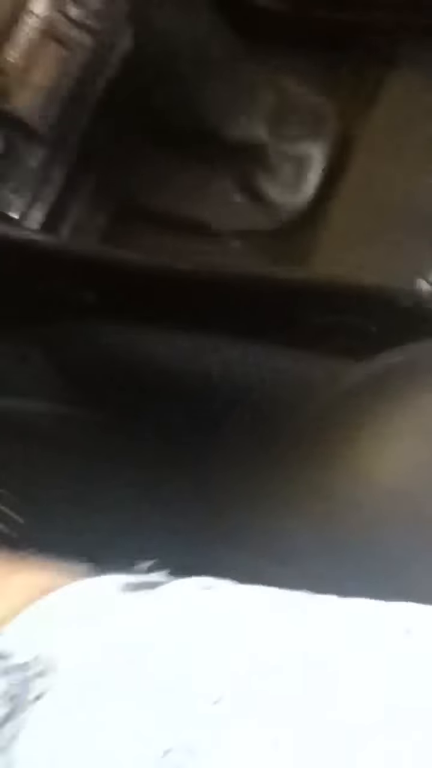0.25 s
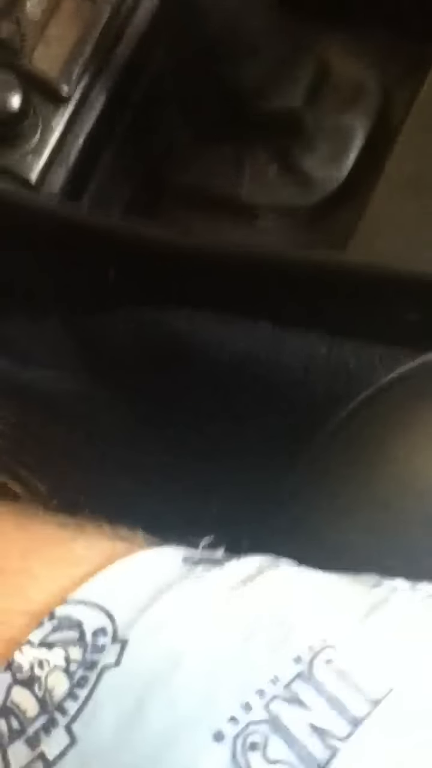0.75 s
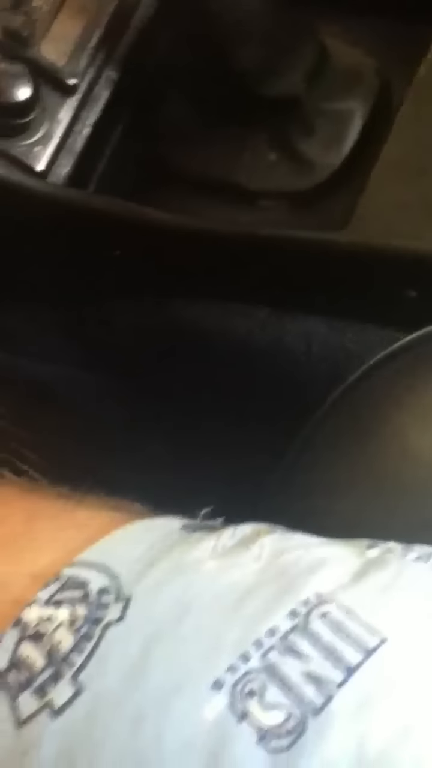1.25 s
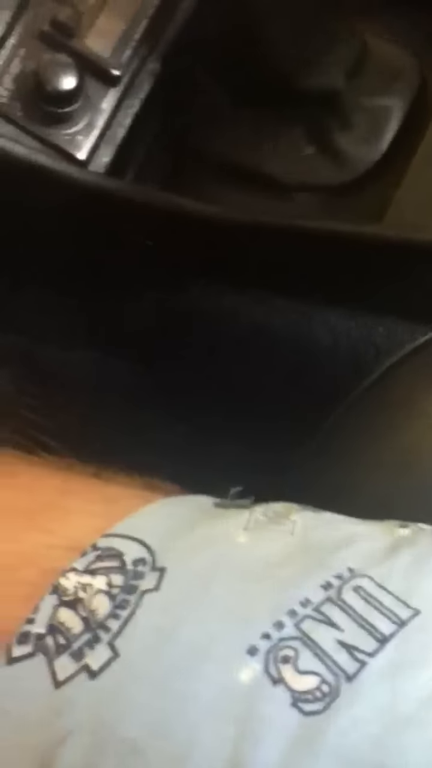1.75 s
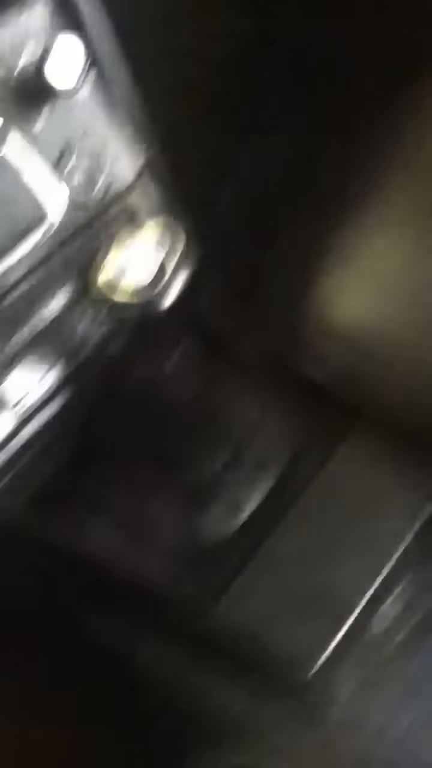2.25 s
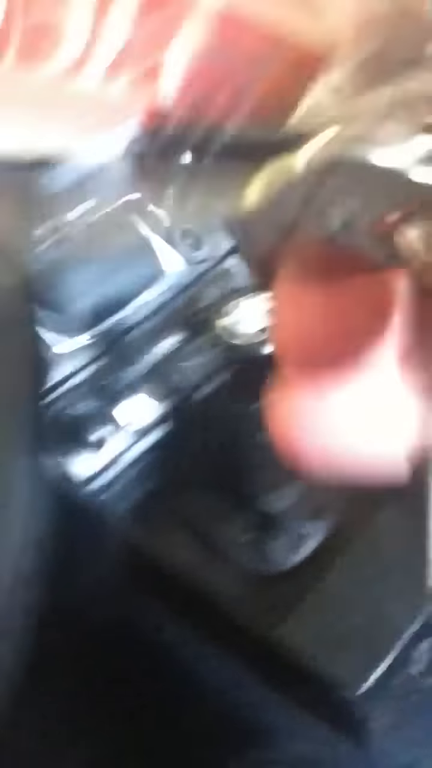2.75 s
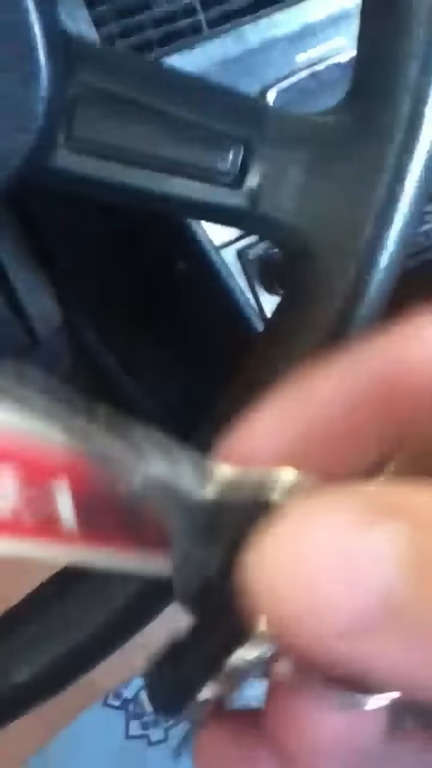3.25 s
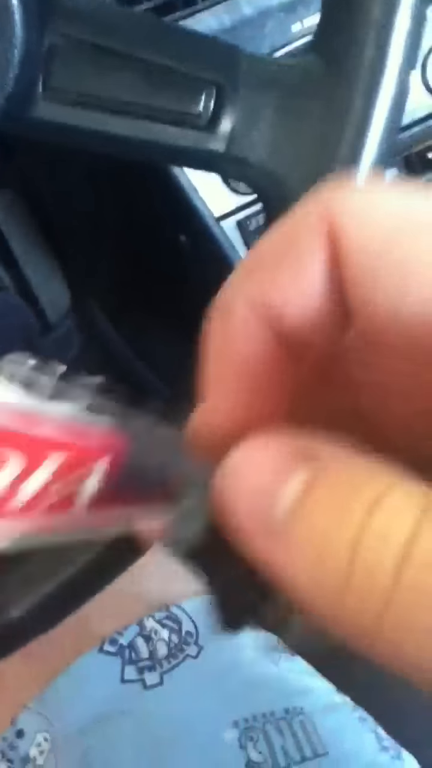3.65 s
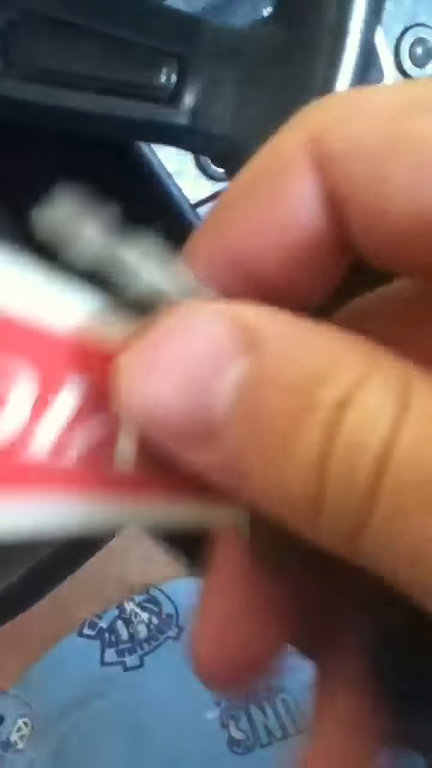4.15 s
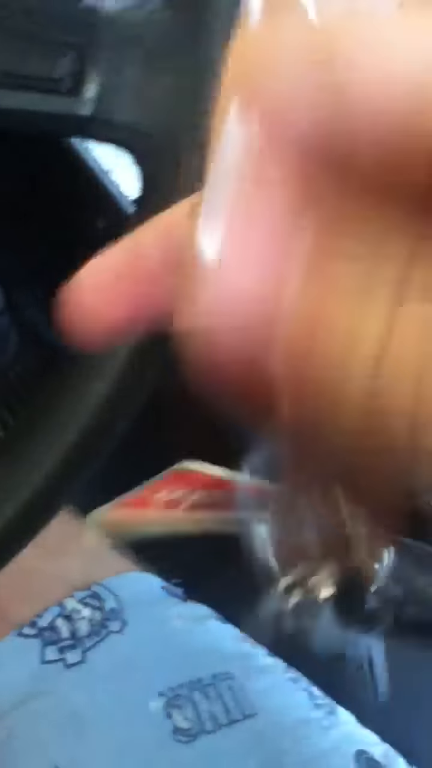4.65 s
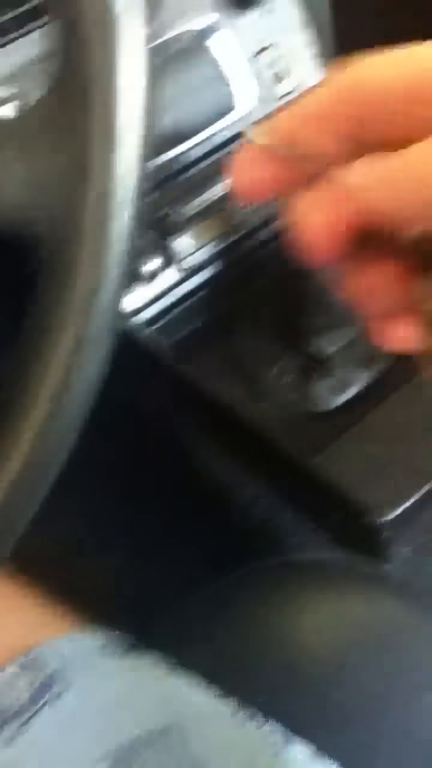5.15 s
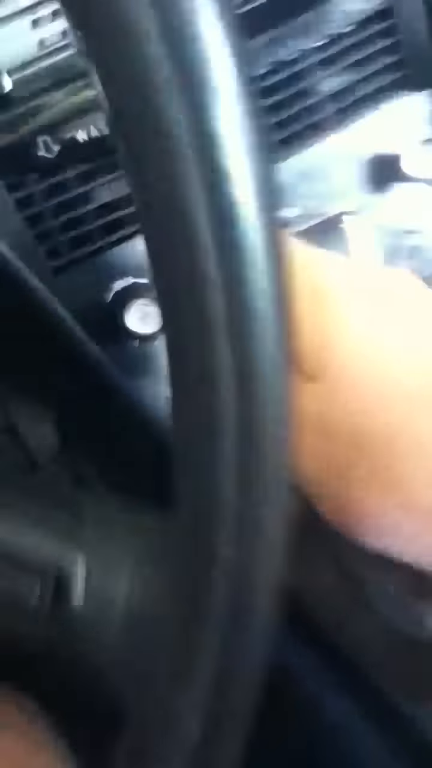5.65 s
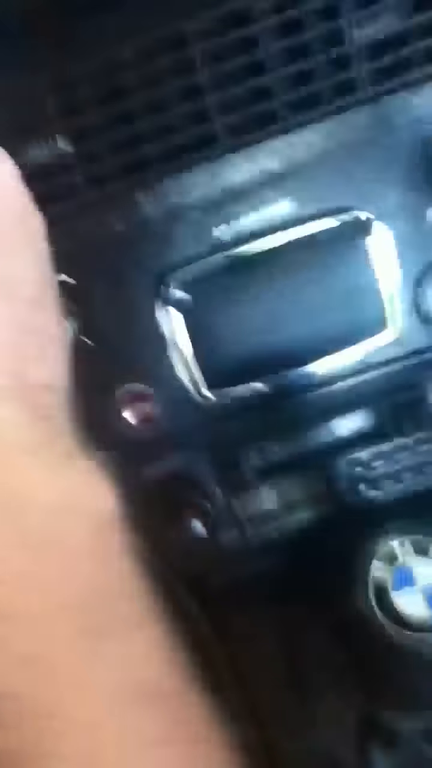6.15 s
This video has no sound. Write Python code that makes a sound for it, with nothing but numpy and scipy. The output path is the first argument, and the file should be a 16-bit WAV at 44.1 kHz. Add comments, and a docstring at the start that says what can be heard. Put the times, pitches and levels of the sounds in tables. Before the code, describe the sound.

Keys on a ring jingle in the hand inside a parked car, heard close up. High, glassy clinks come fast for two seconds, become drier and more clicky as fingers sort them, swell again twice, then almost stop. Plastic tags tap among them, seat cloth rustles softly, and one hollow plastic clack ends it over faint hum and hiss.

```python
"""Keys in a parked car

A bunch of keys is picked up, shaken and sorted in the hand, close to a phone. Keys are noise cracks plus
ringing tones that the fingers damp; small parts chatter as noise and tiny ringing ticks between the clinks.
Plastic tags knock and a trim panel clacks, as fading tones with noisy thuds. Cloth and seat rustle as
filtered noise over the cabin's quiet hum, hiss and faint whine; a short echo follows keys and knocks."""
import sys
import numpy as np
from scipy import signal
from scipy.fft import rfft, irfft, next_fast_len
from scipy.io import wavfile
from scipy.ndimage import uniform_filter1d

SR = 44100
rng = np.random.default_rng(int(sys.argv[2]) if len(sys.argv) > 2 else 0)


def inscribe(sig):
    """Save sig as 16-bit PCM at rate SR to the path in sys.argv[1].

    A 1-D sig is mono; a 2-D sig holds one channel per row.
    Samples are clipped to [-1, 1] before scaling.
    """
    pcm = np.round(np.clip(np.atleast_2d(sig).T, -1, 1) * 32767)
    wavfile.write(sys.argv[1], SR, pcm.astype(np.int16))


N = 282356

# Clear clinks of key on key. Each row: start in seconds, strength in dB,
# pitch in Hz near which modes sound loudest, dull crack relative to the strength in dB.
CLINKS = [(0.3358, -30.5, 4040, 5.5), (.47, -18, 10100, -9), (0.4744, -14, 9670, -10.5),
          (.4775, -13.5, 9700, -10), (0.5226, -5, 10820, -27), (.53, -6.5, 11100, -17),
          (0.5515, -11.5, 9800, -11.5), (0.6062, -15, 12800, -17), (.6157, 1, 12800, -42),
          (0.6244, -8, 12750, -19), (.7666, -21, 13300, -4), (0.7996, -25, 7470, -1),
          (.8389, -25, 7270, -2), (0.9042, -16, 13300, -20), (0.9197, -6.5, 13740, -34),
          (.9385, -9.5, 9700, -29), (0.9443, -19, 10900, -36), (0.962, -25, 7260, -28),
          (.9813, 0.5, 13780, -25), (1.039, -34, 4960, -3), (1.0988, -13, 12300, -43),
          (1.1193, -7, 14100, -31), (1.122, -11, 13820, -45), (1.199, -30, 13100, -31),
          (1.296, -30, 7950, -9), (1.3196, -18, 11100, -30), (1.3542, -15, 9700, -35),
          (1.4245, -24, 8200, -24), (1.595, -25.5, 6700, -1.5), (1.641, -32, 8340, -20),
          (1.654, -25, 8410, -30), (1.6711, -7.5, 8400, -23), (1.675, -8, 7470, -17),
          (1.6988, -15, 12820, -13), (1.733, -17, 12800, -19), (1.7393, -9, 12830, -32),
          (1.756, -15, 12860, -24), (1.772, -14, 12810, -19), (1.7758, -18, 7280, -15),
          (1.806, -8, 13000, -24), (1.84, -26, 12900, -33), (1.909, -18, 8350, -27),
          (1.991, -20, 8340, -20), (2.0406, -25, 10400, -11.5), (2.191, -35.5, 5100, 2),
          (2.208, -22, 8290, -32), (2.2838, -9, 13800, -16.5), (2.31, -20.5, 10540, -14),
          (2.388, -37, 8300, -26), (2.4476, -18.5, 12950, -27), (2.5007, -21.5, 11200, -12),
          (2.5147, -16.5, 8400, -14), (2.5485, -33.5, 5920, 9), (2.5649, -7.5, 13750, -23),
          (2.593, -16.5, 13800, -9.5), (2.6204, -28, 5480, 2), (2.6337, -13.5, 6150, -3.5),
          (2.7017, -9.5, 7900, -16.5), (2.7636, -35.5, 5100, 11), (2.8268, -31.5, 10000, -7),
          (2.879, -35, 8290, -3), (2.9139, -15, 10800, -13), (2.9575, -10.5, 5800, -2),
          (2.987, -27, 8200, 3), (3.001, -13.5, 12500, -8), (3.024, -16, 10460, -5.5),
          (3.058, -34, 8400, 4), (3.085, -23, 8350, -17), (3.1304, -29.5, 10800, -16),
          (3.157, -10, 13000, -9.5), (3.178, -25, 8300, 1), (3.2535, -21.5, 9750, -2.5),
          (3.2744, -16.5, 8330, 0), (3.308, -21.5, 6380, -32), (3.38, -29, 14200, -15),
          (3.414, -34.5, 4010, 8), (3.488, -31.5, 13200, 2), (3.5512, -18.5, 9400, -20),
          (3.5632, -18.5, 13850, -19), (3.583, -20.5, 4870, -35), (3.6338, -25, 8850, -11),
          (3.6601, -10.5, 12800, -25.5), (3.699, -14, 13750, -26), (3.7035, -6, 13750, -43),
          (3.711, -4, 9400, -17), (3.7312, -10, 9700, -31), (3.7491, -11, 9700, -28),
          (3.763, -12.5, 10600, -18), (3.7774, -20.5, 8500, -14), (3.8225, -36.5, 4790, 8),
          (3.8385, -22, 12740, -21), (3.86, -15, 4460, -16), (3.8734, -2.5, 10060, -34),
          (3.9124, -6, 12800, -19), (3.978, -15, 13760, -21), (4.0287, -23.5, 5170, -0.5),
          (4.0451, -17.5, 10300, -13), (4.0669, -9.5, 13800, -16), (4.0798, -17, 9700, -11),
          (4.145, -52, 9000, -5), (4.2163, -42.5, 5320, -5), (4.4243, -42.5, 7260, 1.5),
          (4.5522, -29, 10820, -12), (4.572, -19, 12770, -43), (4.5832, -15, 8380, 1.5),
          (4.5977, -7.5, 13550, -27), (4.627, -20, 8370, -12), (4.6874, -15, 9680, -42),
          (4.695, -11, 9690, -36), (4.8269, -20.5, 9000, -25), (4.849, -17, 8040, -27),
          (4.8964, -16, 9710, 0.5), (4.9372, -17, 8170, -6), (4.955, -21, 10100, -8),
          (4.973, -22.5, 10500, -9), (4.9995, -20, 5120, 7.5), (5.0258, -11, 11460, -27),
          (5.0374, -4, 10520, -11), (5.0788, -31, 8760, -21), (5.1037, -16, 11000, -45),
          (5.1292, -23.5, 6900, -20), (5.1407, -32, 5400, -24), (5.152, -35, 5030, -11),
          (5.258, -41, 7000, -5), (5.271, -4, 7260, -36), (5.2773, -11.5, 9700, -26),
          (5.3068, -8, 10860, -15.5), (5.3406, -23, 9450, -18), (5.3447, -20, 7100, -6),
          (5.3598, -16, 6360, -15), (5.419, -33, 5000, 2.5), (5.5417, -38, 5360, -2),
          (5.6901, -39, 12760, -12), (5.8591, -28.5, 10600, -3.5), (5.89, -32.5, 7270, -20),
          (6.0848, -38, 4130, -4)]
# Ways a key can vibrate. Each row: frequency in Hz, relative level in dB,
# ring time in seconds (the grip shortens it in clinks; chatter rings a little longer).
KEY_MODES = [(3260, -12, .05), (4730, -6, .1), (6370, -6, .06), (7270, -6, .08), (8370, -2, .1),
             (8900, -8, .05), (9700, -2, .07), (10330, -8, .1), (10830, -3, .07), (11210, -8, .1),
             (12250, -6, .04), (12820, 0, .1), (13150, -6, .05), (13800, -2, .08), (15140, -6, .1),
             (15650, -8, .05)]
# How loosely the fingers hold the keys: loose while shaken, tight while sorted.
# Each row: time in seconds, basic ring time in seconds.
GRIP = [(0, 0.1), (.6, 0.064), (1.2, 0.068), (1.7, 0.053), (2.3, 0.035), (2.55, 0.025), (3.0, 0.02),
        (3.45, 0.031), (3.75, 0.024), (4.1, .022), (4.6, 0.029), (4.9, 0.025), (5.3, 0.034), (6.4, 0.041)]
# Keys that hang free and sing on in one mode. Each row: start in seconds, frequency in Hz,
# strength in dB, ring time in seconds (to fade by 60 dB).
RINGS = [(0.611, 12800, -11, 0.11), (0.612, 4734, -32, 0.16), (0.9236, 13781, -24, 0.14),
         (0.9773, 13781, -27, 0.083), (1.1193, 12876, -32, 0.15), (1.1193, 13824, -28, 0.09),
         (1.321, 7350, -35, 0.29), (1.12, 2806, -42, 0.1), (1.3562, 4780, -39, 0.23),
         (1.3562, 15159, -35, 0.18), (1.36, 10000, -24, 0.1), (1.3646, 12876, -38, 0.22),
         (1.3646, 13522, -34, 0.16), (1.32, 8420, -35, 0.27), (1.4236, 8300, -37.5, 0.18),
         (1.6421, 8397, -25.5, 0.16), (1.6709, 13867, -38, 0.14), (1.7332, 12876, -22, 0.16),
         (1.806, 4730, -29, 0.085), (1.806, 12820, -22, 0.17), (1.807, 10200, -35, 0.15),
         (1.807, 15116, -38, 0.38), (3.0, 13300, -35, 0.1), (3.5828, 14900, -40, 0.18),
         (3.9112, 8330, -27.5, 0.09), (3.9112, 12560, -17.5, 0.069), (3.9112, 15202, -37.0, 0.35),
         (3.9149, 10300, -39, 0.39), (3.9149, 11240, -29, 0.25), (3.921, 3050, -47.5, 0.27),
         (4.5979, 13738, -30, 0.11), (4.6869, 13600, -24, 0.12), (4.694, 9670, -28, 0.099),
         (4.694, 10960, -30, 0.11), (4.737, 6160, -55, 0.27)]
# Shakes that set the small parts chattering. Each row: start in seconds, hold in seconds,
# bright level in dB, dull level relative to the bright one in dB.
SHAKES = [(0.059, 0.022, -47, 0), (0.52, 0.13, -37.5, 2), (0.781, 0.054, -47.5, 3),
          (0.908, 0.029, -38.5, -4), (0.976, 0.0094, -30, -12), (1.113, .02, -35.5, -16.5),
          (1.362, 0.042, -33.5, -9), (1.434, 0.037, -46, -9), (1.649, 0.19, -33, -10.5),
          (1.777, 0.015, -32, -10.5), (1.926, 0.023, -39.5, -6), (2.009, 0.058, -43.5, -6),
          (2.206, 0.14, -49, -1.5), (2.505, 0.085, -45.5, -0.5), (2.623, 0.058, -40.5, -10),
          (2.706, 0.075, -49.5, 2), (3.008, .03, -45.5, 0.5), (3.158, 0.0064, -48, 2.5),
          (3.293, 0.018, -51.5, 7.5), (3.406, 0.11, -53.5, 1), (3.743, .17, -39.5, -8.5),
          (4.013, 0.083, -56, -4), (4.607, 0.018, -31.5, -7), (4.691, 0.02, -40, -2.5),
          (4.91, 0.14, -46, -0.5), (5.317, .02, -35, -13), (5.872, 0.093, -58, 7)]
# Knocks of plastic heads, tags and trim. Each row: start in seconds, peak in dB before the echo,
# main frequency in Hz, ring time of the tones in seconds.
KNOCKS = [(0.337, -28.5, 321, 0.11), (0.471, -24.5, 288, 0.03), (0.513, -25, 285, 0.054),
          (0.766, -27.5, 302, 0.034), (0.968, -37, 253, 0.032), (2.627, -31.5, 2160, 0.048),
          (2.791, -30, 880, 0.032), (2.986, -25.5, 837, 0.031), (3.152, -39.5, 252, 0.11),
          (3.255, -34, 572, 0.041), (3.274, -37.5, 625, 0.022), (3.413, -24.5, 857, 0.037),
          (4.101, -42, 885, 0.03), (4.586, -34.5, 1430, 0.045), (4.72, -43.5, 324, 0.047),
          (4.893, -31, 1650, 0.046), (4.995, -29.5, 1750, 0.015), (5.343, -34, 1750, 0.052),
          (5.276, -46, 1660, 0.037), (5.412, -42.5, 1694, 0.16), (5.809, -36.5, 853, 0.06)]
# Tones inside a knock. Each row: multiple of the main frequency, relative level in dB.
KNOCK_MODES = [(1, 22.5), (.48, 6.5), (1.45, -27), (2.2, 14)]
# Tones of the dashboard trim panel. Each row: frequency in Hz, relative level in dB, ring time in seconds.
PANEL_MODES = [(234.6, -0.5, 0.22), (502, -1.5, 0.1), (1050, -4.5, 0.12), (1242, 10, 0.034)]
# Distinct rubs of cloth and seat. Each row: start in seconds, hold in seconds,
# low rub level in dB, swish level in dB.
RUBS = [(0.358, 0.0055, -36.5, -37.5), (0.498, .17, -37.5, -42.5), (0.705, 0.025, -48, -70),
        (0.772, 0.0086, -64, -44), (5.831, 0.041, -48.5, -48.5), (6.245, .02, -53, -65)]
# The body shifting in the seat all along. Each row: time in seconds, low rub level in dB, swish level in dB.
SHIFTING = [(0, -44, -53.5), (.2, -54.5, -57.5), (.75, -52, -71), (1.1, -62, -70.5), (2.1, -57.5, -66),
            (2.6, -54, -54.5), (3.5, -50.5, -55.5), (4.0, -63.5, -69.5), (4.5, -64.5, -72),
            (4.7, -55.5, -69), (5.4, -62.5, -69.5), (5.77, -61.5, -62.5), (5.95, -50.5, -55),
            (6.15, -45, -59.5), (6.4, -49.5, -59.5)]
# Colour of the cabin noise. Each row: frequency in Hz, relative level per Hz in dB.
CABIN_COLOUR = [(12, -49), (20, -38), (32, 5.5), (289, 0), (323, -12), (1210, -30), (2510, -14.5),
                (7730, -12.5), (8650, -14), (16500, -19)]

# balance of treble over lower sound in a clink: base for low and high pitches (dB),
# change per dB of dull crack, change per second of grip ring time (dB)
TILT_LOW_DB, TILT_HIGH_DB, TILT_PER_DULL, TILT_PER_S = -15, -8, -0.36, 119
TREBLE_HZ = 11600  # modes above this belong to the treble
DULL_DAMP = 0.063  # dB shorter ring per dB of dull crack: a key hitting plastic or flesh stops sooner
TICK_S, TICK_DB = 0.00081, -4  # first touch of metal: fade time; level before the grip lowers it
LOOSE_S = .06  # grip ring time at which chatter gets its reference amount of ringing
SHAKE_RISE_DB_S, SHAKE_FALL_DB_S = 358, 289  # dB per second
REST_DB, REST_DULL_DB = -68, -64  # floor of the chatter between shakes
RUB_RISE_DB_S, RUB_FALL_DB_S = 500, 287  # dB per second
CLACK_S, CLACK_PEAK_DB = 6.198, -21  # start; peak before the echo
CABIN_DB = -61  # rms level of hum and hiss
WHINE_HZ, WHINE_DB = 3531, -77.5  # steady pitch; middle of the wandering level
ECHO_T60_S, ECHO_DB = .05, -10
TOP_HZ = 16900  # upper edge of the phone's range


def undb(db):
    """Turn decibels into a plain amplitude factor."""
    return 10 ** (np.asarray(db) / 20)


def level(x, db):
    """Scale to an rms level, a kind of average loudness."""
    return x * undb(db) / np.sqrt(np.mean(x ** 2))


def peak(x, db):
    """Scale so that the largest swing has this level."""
    return x * undb(db) / (np.max(np.abs(x)) + 1e-18)


def band(x, lo_hz, hi_hz):
    """Keep mainly the frequencies between two limits (Butterworth band-pass)."""
    sos = signal.butter(2, [lo_hz, min(hi_hz, .45 * SR)], "band", fs=SR, output="sos")
    return signal.sosfilt(sos, x)


def fade(t, t60):
    """Die away smoothly, 60 dB down after t60 seconds."""
    return np.exp(-np.log(1000) * t / t60)


def curve(table):
    """Read a table of times and values as smooth curves, one value per sample."""
    s, *columns = np.transpose(table)
    return [np.interp(np.arange(N) / SR, s, c) for c in columns]


def add(out, s, sound):
    """Mix a sound in at a time in seconds."""
    i = int(s * SR)
    out[i:i + len(sound)] += sound[:N - i]


def walk(rate):
    """Make a wandering curve that glides between random values, about `rate` of them per second."""
    k = int(SR / rate)
    steps = np.repeat(rng.standard_normal(N // k + 1), k)
    return uniform_filter1d(steps, k)[:N]


def patchy(noise, db, width_hz):
    """Give a noise a random colour of peaks and hollows, so that each crack sounds a little different."""
    spectrum = rfft(noise)
    k = int(width_hz * len(noise) / SR) + 1
    steps = np.repeat(rng.standard_normal(len(spectrum)), k)[:len(spectrum)]
    ripple = uniform_filter1d(steps, k // 2 + 1)
    return irfft(spectrum * undb(db * ripple), len(noise))


def gestures(table, rise_db_s, fall_db_s):
    """Power of two sound parts as the hand moves: each gesture rises, holds and falls at fixed rates."""
    t = np.arange(0, N, 32) / SR  # coarse steps are enough for slow curves
    power = 0
    for s, hold, *db in table:
        before, after = np.clip(s - t, 0, None), np.clip(t - s - hold, 0, None)
        shape_db = -rise_db_s * before - fall_db_s * after
        power = power + undb(2 * (np.array(db)[:, None] + shape_db))
    return [np.interp(np.arange(N) / SR, t, p) for p in power]


def clinks():
    """A blow cracks, scrapes shortly and rings the key modes, which fingers and other keys damp."""
    size = 3600
    out, t = np.zeros(N), np.arange(size) / SR
    hz, mode_db, t60 = np.transpose(KEY_MODES)
    upper = hz > TREBLE_HZ
    for s, db, main_hz, dull_db in CLINKS:
        chance, noise = rng.standard_normal((3, len(hz))), rng.standard_normal((4, size))
        held = max(np.interp(s, *np.transpose(GRIP)), .008)
        tilt_db = TILT_HIGH_DB if main_hz > TREBLE_HZ else TILT_LOW_DB
        tilt_db += TILT_PER_DULL * dull_db + TILT_PER_S * held
        held *= undb(-DULL_DAMP * (dull_db + 21))

        # the struck mode stands out; the others sound by chance, well below
        below_db = 5.6 * np.log2(hz / main_hz) * (hz < main_hz)
        away_db = -19.6 * (1 - np.exp(-((hz - main_hz) / 400) ** 2))
        gain = undb(mode_db + 6.9 * chance[0] + below_db + away_db)
        tone_hz = hz * (1 + 0.0045 * chance[1])
        tones = gain[:, None] * np.sin(2 * np.pi * tone_hz[:, None] * t + 3 * chance[2][:, None])
        # fingers and neighbouring keys shorten the ring; bounces make it flutter slightly
        tones *= fade(t, 1 / (1 / t60[:, None] + 0.48 / held))
        tones *= 2.5 + level(band(noise[3], 54, 431.5), -14.0)

        # a tightly held key cracks harder and shorter; a loose one starts softly and scrapes on
        burst = (0.037 / held) ** 2 * fade(t, 0.009) + fade(t, 1.45 * held)
        low = peak(tones[~upper].sum(axis=0), -3.5)
        low += peak(burst * band(patchy(noise[0], 5.0, 350), 4000, 11500), -1.5)
        high = peak(tones[upper].sum(axis=0), -6.1)
        high += peak(burst * band(patchy(noise[1], 8.5, 350), 10870, 14730), -8.0)
        dull = peak(burst * band(patchy(noise[2], 2.34, 300), 1560, 3830), dull_db - 1.0)
        tick = peak(fade(t, TICK_S) * band(noise[3], 2500, 14600), TICK_DB - 150 * held)

        share = 1 / (1 + undb(-2 * tilt_db))  # treble's share of the power
        rise = 1 - np.exp(-t / (0.0045 * held))
        blow = np.sqrt(1 - share) * low + np.sqrt(share) * high + dull + tick
        add(out, s, undb(db - 0.5) * rise * blow)
    return out


def rings():
    """A free key sings on in one mode; a slightly weaker twin tone close by makes it beat."""
    size = 14000
    out, t = np.zeros(N), np.arange(size) / SR
    for (s, hz, db, t60), chance in zip(RINGS, rng.standard_normal((len(RINGS), 2))):
        tone = np.sin(2 * np.pi * hz * t)
        tone += 0.92 * np.sin(2 * np.pi * (hz + 60 * chance[0]) * t + 3 * chance[1])
        # the key swings and brushes its neighbours
        flutter = 1 + level(band(rng.standard_normal(size), 15, 90), -12.5)
        rise = 1 - np.exp(-t / 0.00069)
        add(out, s, undb(db + 2.5) * tone * fade(t, t60) * flutter * rise)
    return out


def chatter():
    """Dense tiny contacts of uneven size make short bursts of noise, and ticks that ring the key modes."""
    shakes = [(s, hold, db, db + rel) for s, hold, db, rel in SHAKES]
    power, dull_power = gestures(shakes, SHAKE_RISE_DB_S, SHAKE_FALL_DB_S)
    db = 10 * np.log10(power + undb(2 * REST_DB))
    dull_db = 10 * np.log10(dull_power + undb(2 * REST_DULL_DB))

    # about 300 contacts per second, each leaving a short trail of grit
    ticks = (rng.random(N) < 300 / SR) * undb(4.4 * np.clip(rng.standard_normal(N), -2, 2))
    grit = np.sqrt(signal.lfilter([1], [1, -fade(1 / SR, 0.015)], ticks ** 2) + 0.026)
    ring = 0
    for hz, mode_db, t60 in KEY_MODES:
        # a filter that spins at the mode's pitch while it fades
        pole = fade(1 / SR, 1.24 * t60) * np.exp(2j * np.pi * hz / SR)
        struck = signal.lfilter([1], [1, -pole], ticks * rng.standard_normal(N))
        ring = ring + undb(mode_db) * struck.imag

    bright = level(grit * band(rng.standard_normal(N), 5920, 9770), -2.0)
    # a lively, loosely held bunch rings more; a quiet one mostly hisses in the fingers
    liveliness = undb(np.minimum(db + 40, 0)) * curve(GRIP)[0] / LOOSE_S
    bright += level(ring, -1.5) * liveliness
    dull = level(grit * band(rng.standard_normal(N), 1690, 4900), -3.1)
    return bright * undb(db) + dull * undb(dull_db)


def knocks():
    """Plastic parts give dull blows: a few quickly fading tones and a noisy thud."""
    size = 8000
    out, t = np.zeros(N), np.arange(size) / SR
    for s, db, hz, t60 in KNOCKS:
        body = sum(undb(g) * np.sin(2 * np.pi * k * hz * t) for k, g in KNOCK_MODES) * fade(t, t60)
        thud = band(rng.standard_normal(size), max(200, 0.29 * hz), max(1600, 1.35 * hz))
        thud *= fade(t, 1.93 * t60)
        # low knocks shake the hand
        boom = band(rng.standard_normal(size), 50.7, 300) * fade(t, 3.0 * t60) * (hz < 1000)
        blow = peak(body, 0) + peak(thud, 0.79) + peak(boom, -8.0)
        add(out, s, peak(blow * (1 - np.exp(-t / 0.0024)), db))
    return out


def clack():
    """One blow makes the trim panel sound its own fading tones and its loose fittings rattle as noise."""
    out, t = np.zeros(N), np.arange(9000) / SR
    body = sum(undb(db) * np.sin(2 * np.pi * hz * t) * fade(t, t60) for hz, db, t60 in PANEL_MODES)
    rattle = band(rng.standard_normal(len(t)), 820, 1600) * fade(t, 0.084)
    body += peak(rattle, 1.9)
    add(out, CLACK_S, peak(body * (1 - np.exp(-t / 0.0024)), CLACK_PEAK_DB))
    return out


def rustle():
    """Cloth and seat rub in uneven little jerks: a low and a swishing noise of changing level."""
    rub_powers = gestures(RUBS, RUB_RISE_DB_S, RUB_FALL_DB_S)
    low_db, swish_db = (10 * np.log10(rub + undb(2 * shift_db))
                        for rub, shift_db in zip(rub_powers, curve(SHIFTING)))
    low = level(band(rng.standard_normal(N), 140, 446), -4.0) * undb(low_db + 3.84 * walk(70))
    swish = level(band(rng.standard_normal(N), 525, 1940), -2.2) * undb(swish_db + 2.0 * walk(55))
    return low + swish


def cabin():
    """Steady hum and hiss are noise with a set colour; a faint whine of steady pitch wanders in level."""
    size = next_fast_len(N)
    hz, db = np.transpose(CABIN_COLOUR)
    bins_hz = np.arange(size // 2 + 1) * SR / size
    colour = undb(np.interp(np.log(bins_hz + 1), np.log(hz), db))
    hum = irfft(rfft(rng.standard_normal(size)) * colour, size)[:N]
    whine_gain = undb(WHINE_DB + 3.2 * walk(4.4)) * np.sqrt(2)
    whine = whine_gain * np.sin(2 * np.pi * WHINE_HZ * np.arange(N) / SR)
    return level(hum, CABIN_DB) + whine


def scene():
    """Keys and knocks with the short echo of glass and upholstery, over rustle and hum."""
    near = clinks() + rings() + chatter() + knocks() + clack()
    size = 5000
    t = np.arange(size) / SR
    echo = rng.standard_normal(size) * fade(t, ECHO_T60_S) * (t > .002)  # fading noise after a 2 ms gap
    wet = signal.fftconvolve(near, echo / np.sqrt(np.sum(echo ** 2)))[:N]
    return (near + undb(ECHO_DB) * wet + rustle() + cabin())[None]


def record(dry):
    """The phone softens the highest treble, then cuts the top off sharply."""
    soft = signal.sosfilt(signal.butter(8, 15800, fs=SR, output="sos"), dry)
    return signal.sosfilt(signal.ellip(10, .2, 80, TOP_HZ, fs=SR, output="sos"), soft)


dry = scene()
out = record(dry)
inscribe(out)
```